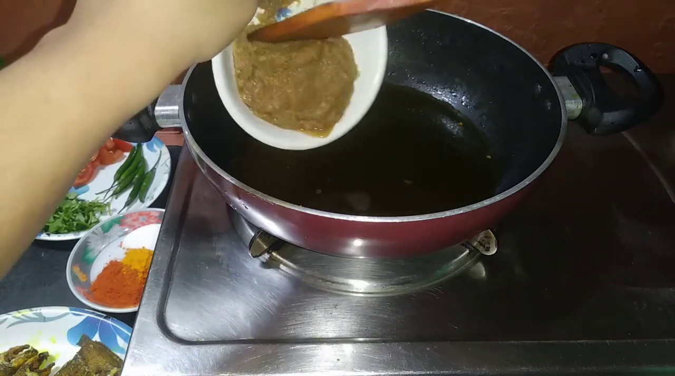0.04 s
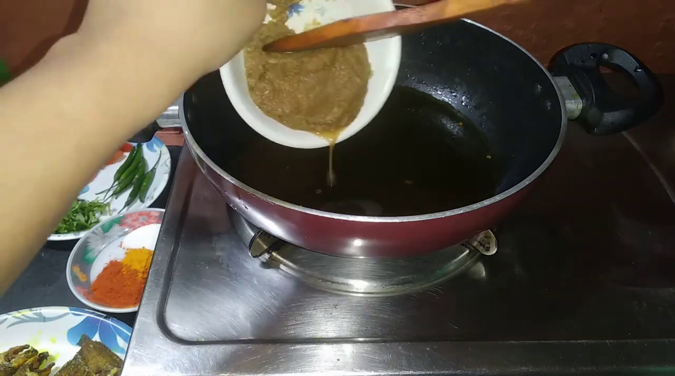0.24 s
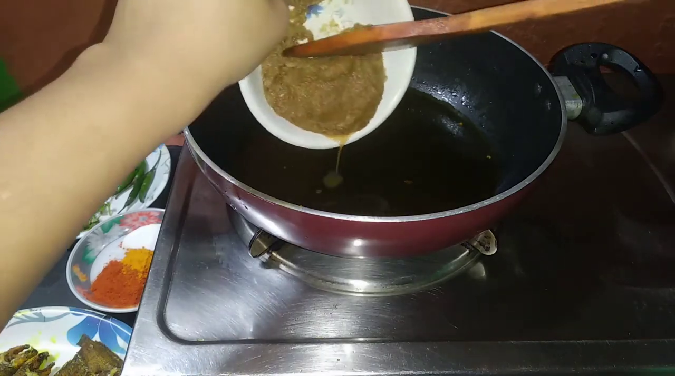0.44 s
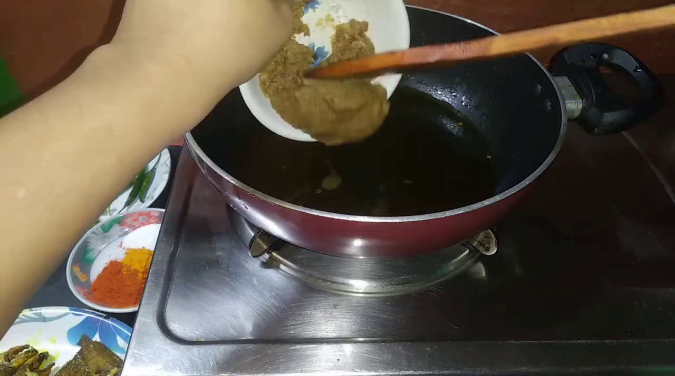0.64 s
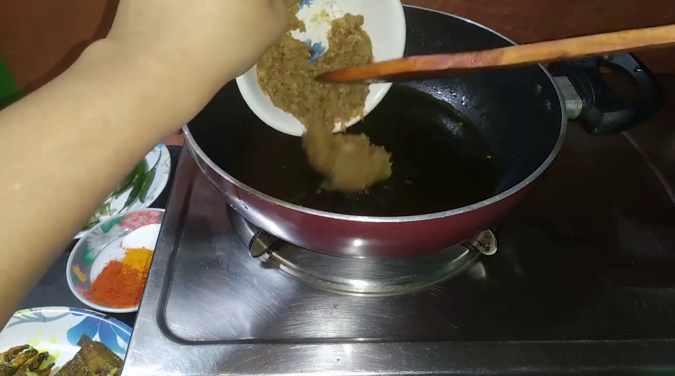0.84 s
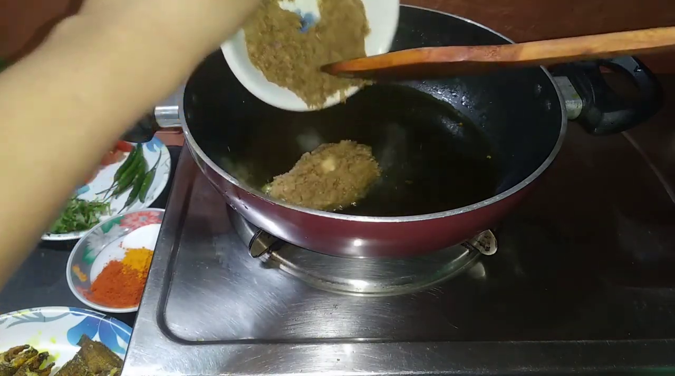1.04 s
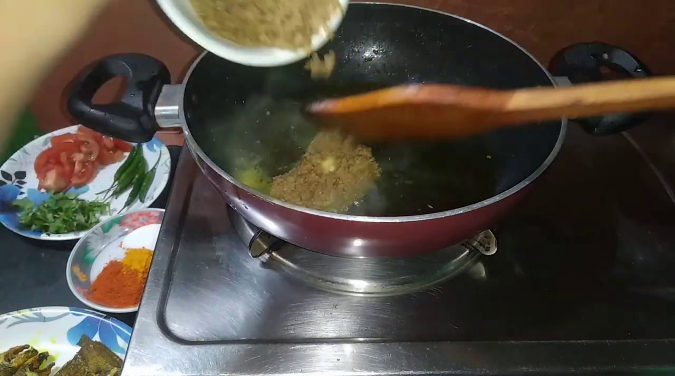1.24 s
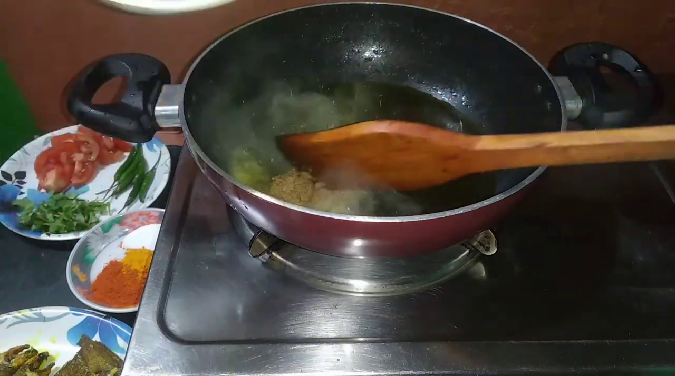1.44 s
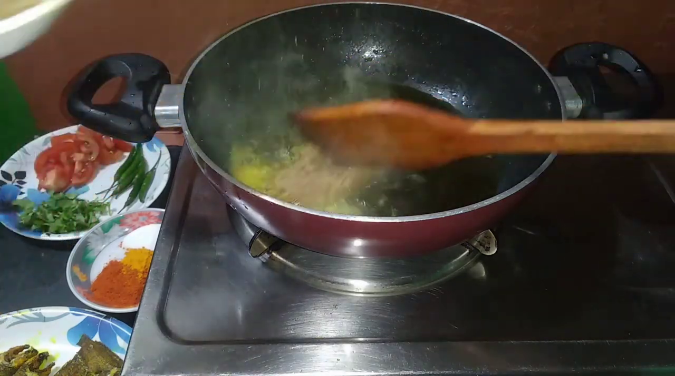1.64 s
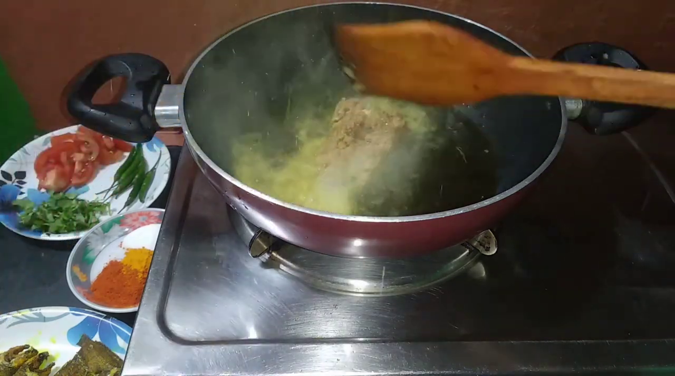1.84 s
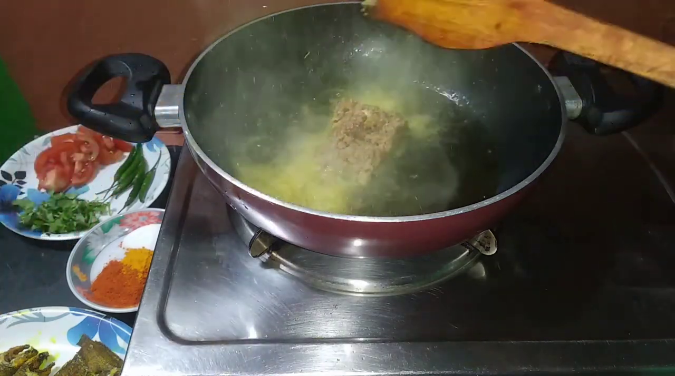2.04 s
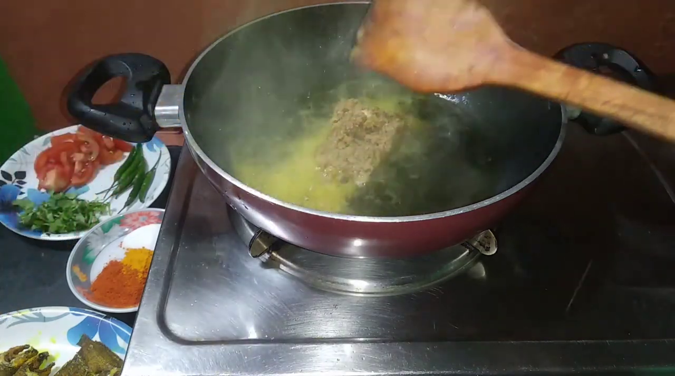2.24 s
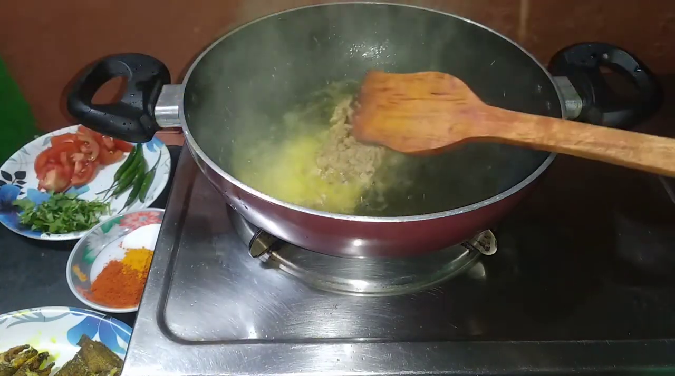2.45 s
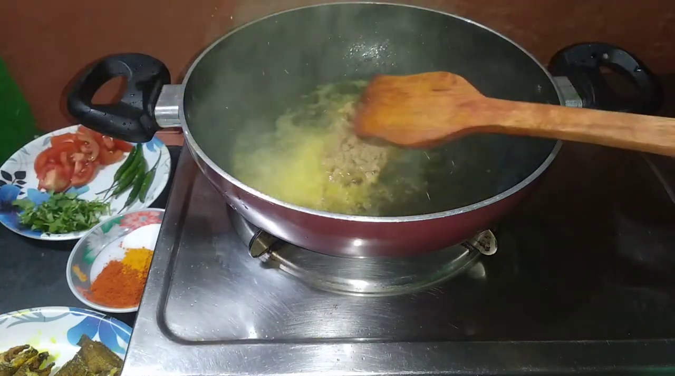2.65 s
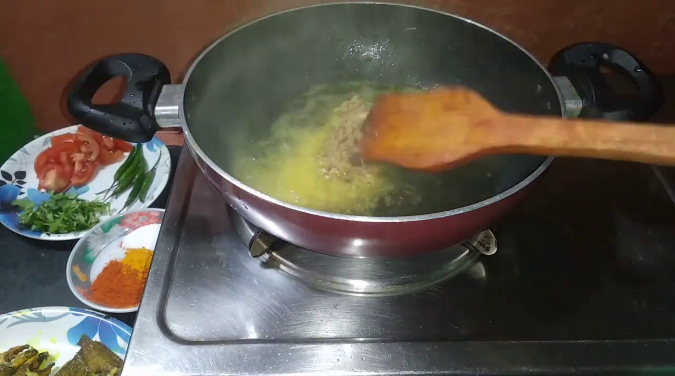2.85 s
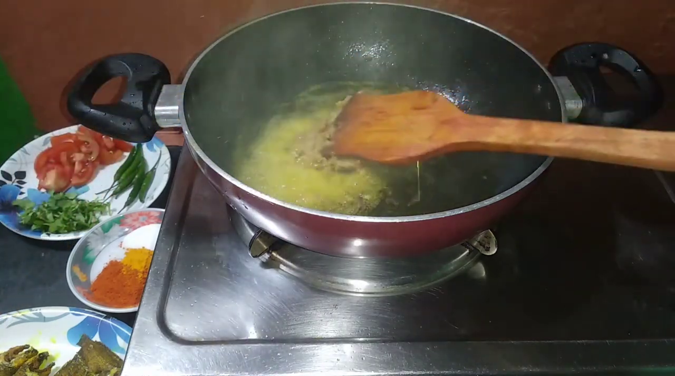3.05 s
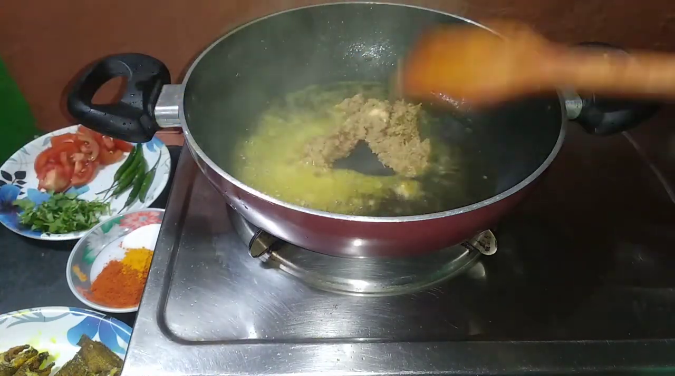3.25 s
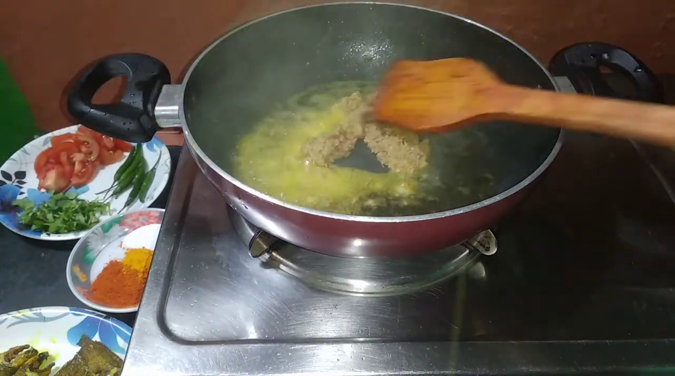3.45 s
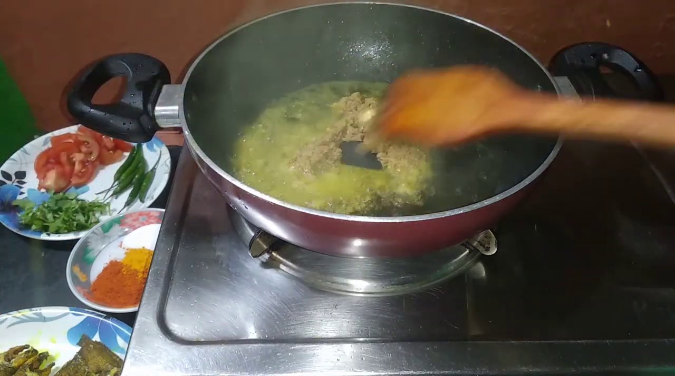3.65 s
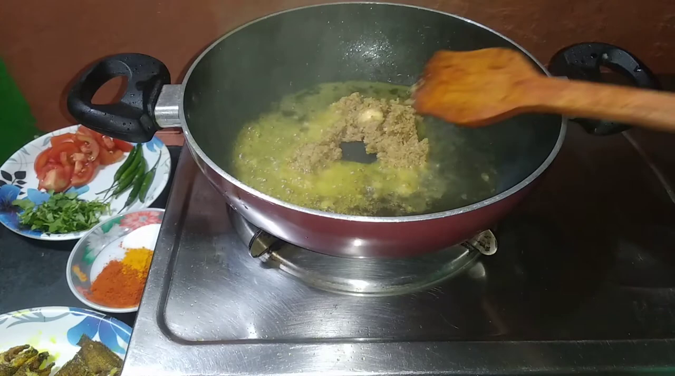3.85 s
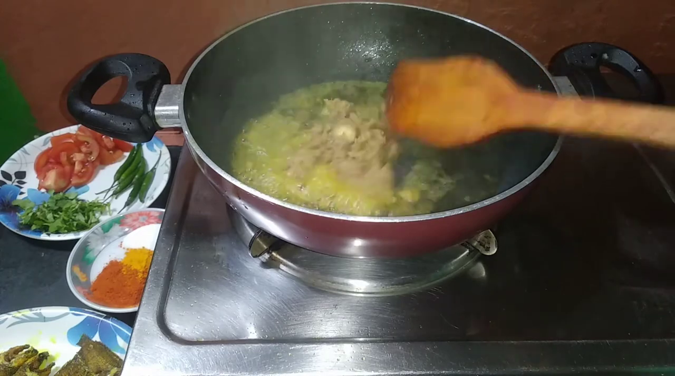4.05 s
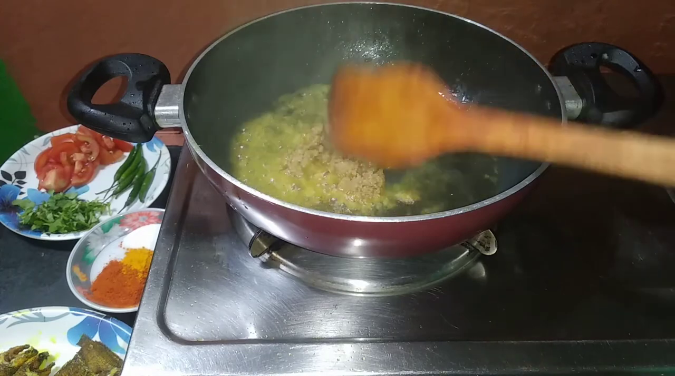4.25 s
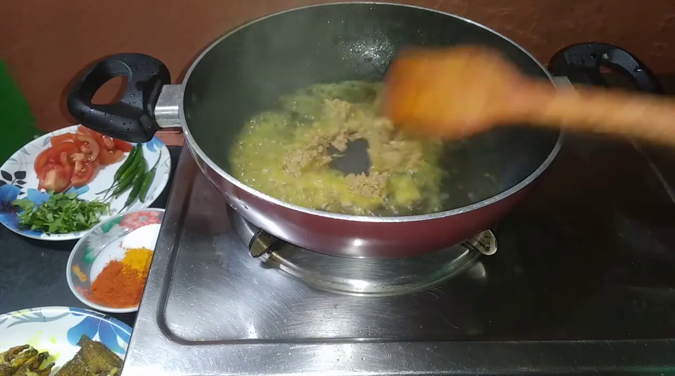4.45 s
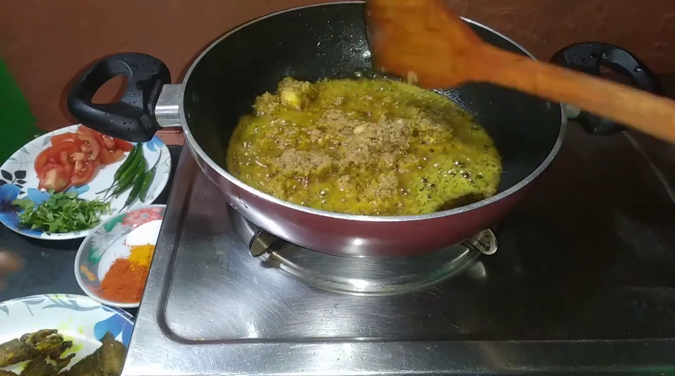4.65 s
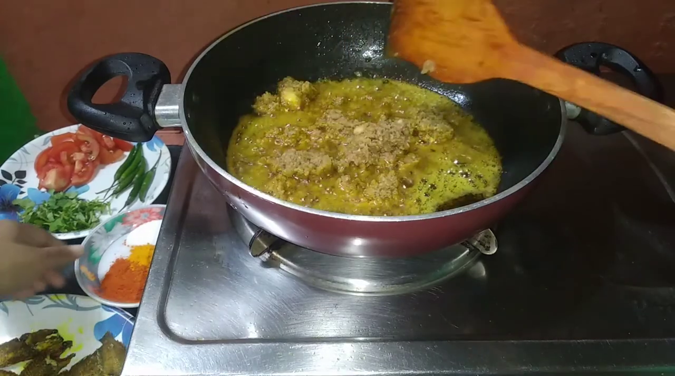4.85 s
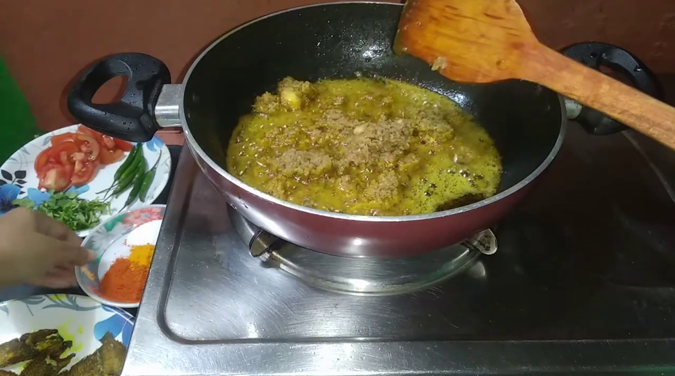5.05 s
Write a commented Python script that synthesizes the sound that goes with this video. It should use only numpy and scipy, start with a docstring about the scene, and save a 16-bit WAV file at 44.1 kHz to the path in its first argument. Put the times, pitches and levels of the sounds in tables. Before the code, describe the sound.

A near-silent kitchen with faint low tones, soft rustles and a light knock; half a second in, a drip squeals and fizzes in hot oil. Around one second wet paste lands and erupts into loud, bright sizzling with spits, pops and gurgles. Dull wooden spatula knocks follow. The boil eases slowly, then cuts abruptly to a quiet murmur. Close, small mono microphone, thin bass, short room tail.

```python
"""Wet onion paste meets hot oil

In a quiet kitchen a few drips fizz in a deep pan, the first one squealing; then the lump lands and boils fiercely.
Random tiny steam bursts make the hiss; larger bubbles spit, pop, gurgle and rumble, coloured by the pan's bowl.
A wooden spatula knocks now and then; pops and knocks reach the small microphone with a short tail off the walls.
Faint tones and rustles come first; near the end one hears, from one instant to the next, only a far quieter murmur.
"""
import sys
import numpy as np
from scipy import signal
from scipy.fft import rfft, irfft
from scipy.io import wavfile
from scipy.ndimage import uniform_filter1d

SR = 44100
rng = np.random.default_rng(int(sys.argv[2]) if len(sys.argv) > 2 else 0)


def transcribe(signal):
    """Save signal, clipped to [-1, 1], as a 16-bit WAV file at the path in sys.argv[1]."""
    frames = np.atleast_2d(signal).T
    limited = np.clip(frames, -1, 1)
    pcm = np.round(limited * 32767).astype(np.int16)
    wavfile.write(sys.argv[1], SR, pcm)


def gain_from_decibels(decibels):
    """Convert decibel values to linear amplitude factors."""
    exponent = np.asarray(decibels, float) / 20
    return 10 ** exponent


N = 225439

# Quiet kitchen background. Each row: frequency in Hz, relative level in dB per Hz.
KITCHEN_SPECTRUM = [(24, -32), (55, -40), (110, -1.5), (213, -6), (390, -12), (622, -15), (945, -15.5),
                    (1150, -13.5), (1450, -17), (2620, -22), (3880, -28), (6050, -25.5), (15500, -34)]
# Peaks of that background. Each row: centre in Hz, width in Hz, height in dB.
KITCHEN_PEAKS = [(284, 28, 2.5), (467, 60, 10), (1276, 41, 15.5), (2970, 150, 10), (3450, 400, 2),
                 (3950, 160, 12)]
# Faint low tones that come and go. Each row: start in seconds, length in seconds, pitch in Hz, level in dB.
LOW_TONES = [(-.03, 0.052, 484, -62), (0.32, 0.057, 490, -61.5), (0.39, 0.041, 287, -61),
             (0.442, 0.13, 292, -66), (.47, 0.077, 486, -69), (.6, 0.072, 280, -64),
             (0.657, 0.093, 480, -63), (0.748, 0.16, 284, -66), (0.795, 0.16, 487, -63)]
# Soft brushing before the first drip. Each row: start in seconds, length in seconds, level in dB,
# centre in Hz, width in octaves.
BRUSHES = [(0.086, 0.039, -69, 5500, 1.5), (0.118, 0.087, -63, 5500, 1.9), (.225, 0.044, -71, 1800, 1.4),
           (0.319, 0.062, -59, 1800, .5), (0.321, .06, -61.5, 4300, 1.2)]
# Dull knocks of spatula and bowl. Each row: start in seconds, level in dB, starting pitch in Hz,
# ring time (60 dB decay) in seconds.
SPATULA_KNOCKS = [(.0965, -60, 385, 0.022), (.0995, -48.5, 382, 0.02), (.1005, -56, 815, 0.017),
                  (.111, -58, 370, 0.017), (1.541, -34, 203, 0.0082), (1.613, -35, 231, 0.0089),
                  (1.6645, -29.5, 406, 0.0068), (2.1995, -40, 230, .016), (4.918, -45, 287, 0.086),
                  (4.948, -45.5, 500, 0.14), (4.985, -48, 870, 0.079), (4.957, -47, 182, 0.069),
                  (4.986, -46, 150, 0.058), (5.007, -51, 139, 0.11)]
# Vigour of the boil before wander and brief changes. Each row: time in seconds, fine fizz in dB,
# top of the fizz against it in dB, spitting in dB, bubbling in dB.
BOIL_VIGOUR = [(.37, -99, 15, -90, -73), (.44, -66, 9, -76, -67), (.5, -59.5, -7, -51, -60),
               (.6, -48.5, -13, -47.5, -67.5), (.915, -46.5, -16, -43.5, -56), (.93, -45.5, 6, -39, -59),
               (.945, -38, 0, -39.5, -44), (.98, -32.5, -7, -32, -39), (.995, -34.5, -3, -43, -36.5),
               (1.02, -37.5, -4, -36, -41), (1.048, -29, -7, -37, -37.5), (1.073, -25.5, -8, -36, -39),
               (1.1, -25, -8, -31, -37), (1.12, -23.5, -7, -28, -46), (1.15, -24.5, -7, -23, -36),
               (1.27, -24.5, -6.5, -27.5, -39), (1.38, -25, -9.5, -28, -36.5), (1.46, -26, -5, -31.5, -39),
               (1.53, -19.5, -10.5, -27.5, -38), (1.62, -22, -5, -31, -33), (1.7, -22, -5.5, -26, -35),
               (1.85, -19, -7.5, -26.5, -36), (2.02, -18, -5.5, -27, -33), (2.15, -19, -6.5, -27, -42.5),
               (2.3, -22, -7.5, -25.5, -34), (2.5, -22, -5, -27.5, -38.5), (2.7, -23, -8.5, -31, -38.5),
               (2.9, -23.5, -4, -30.5, -38.5), (3.05, -23.5, -5.5, -33.5, -35),
               (3.2, -25, -9.5, -31.5, -43.5), (3.38, -27, -6, -33, -36.5), (3.55, -26, -5.5, -32.5, -42),
               (3.64, -25.5, -3, -35.5, -42.5), (3.8, -25.5, -10, -33.5, -46.5),
               (3.93, -26, -5.5, -36.5, -39), (4.05, -25.5, -5.5, -30.5, -48),
               (4.13, -24.5, -8.5, -37.5, -44), (4.25, -28, -2, -37.5, -43), (4.38, -28, -4.5, -39.5, -45),
               (4.52, -30.5, -7, -42, -45.5), (4.66, -26, -4.5, -37.5, -47.5),
               (4.9379, -29.5, -4.5, -42.5, -43), (4.938, -51, -10, -59, -50.5),
               (5.11, -54.5, 2, -57.5, -54)]
# The largest bubbles, likewise. Each row: time in seconds, gurgle in dB, rumble in dB.
LARGEST_BUBBLES = [(.4, -85, -95), (.9, -78, -90), (1.0, -57.5, -67), (1.45, -50.5, -57),
                   (1.75, -49, -52.5), (2.3, -49.5, -58), (3.0, -49.5, -58.5), (3.5, -56.5, -63),
                   (4.0, -58, -61.5), (4.5, -59.5, -62), (4.9379, -56.5, -60), (4.938, -64, -61),
                   (5.11, -73, -61)]
# Brief surges and dips of the boil. Each row: time of the extreme in seconds, change in fizz in dB,
# change in spitting and bubbling in dB, up or down (gurgle and rumble take a share of the latter).
SURGES_AND_DIPS = [(.51, 9, 0), (.57, 6, 1), (.637, 6, -5), (.668, 5, -3), (0.705, 10, 9), (.768, 4.5, 2),
                   (0.845, 12.5, -5), (1.23, -3, 6), (1.611, 7, 0), (1.665, 4.5, 3), (1.52, 0, -3),
                   (1.57, 3, -3), (1.75, 5.5, -5), (1.91, 3.5, -1), (1.952, -1, 3.5), (2.05, 3, 1.5),
                   (2.18, 2.5, -5), (2.298, 6, 1), (2.43, -2, 1.5), (2.6, 1.5, 1), (2.832, 6.5, 0.5),
                   (2.887, 2, 7.5), (3.11, 1.5, -4), (3.244, 5.5, -5), (3.256, 7, 4.5), (3.283, 5, 1),
                   (3.31, 0, 1.5), (3.469, 7.5, 10), (3.562, 1.5, 6), (3.6, 5, 6), (3.662, 2, -3),
                   (3.781, 0, 8), (3.9, -2, -2), (3.98, -5, 6), (4.061, 0, 4), (4.187, 6, 5), (4.33, 2, 7),
                   (4.428, 7, 4), (4.61, 2, 7), (4.72, 3, 2), (4.82, 7, 4.5), (4.918, -4, 13)]
# Spectra of the bubble sizes, fine to large. Each row: frequency in Hz, relative level in dB per Hz.
FIZZ_SPECTRUM = [(2000, -19), (3400, -22.5), (3720, 0), (4980, -1), (6370, 2.5), (10500, -3.5),
                 (13600, -23), (22000, -120)]
FIZZ_TOP_SPECTRUM = [(5290, -52.5), (9000, -1), (12500, -3), (14800, -3), (15800, -4.5)]
SPITTING_SPECTRUM = [(1060, -50), (1800, -7), (1990, -1.5), (2240, 2), (3600, 8.5), (4680, -35),
                     (7920, -120)]
BUBBLING_SPECTRUM = [(470, -108), (800, -10.5), (994, -6), (1310, -1), (1800, -2), (2340, 3), (3960, -120)]
GURGLE_SPECTRUM = [(240, -63), (400, -13.5), (644, -4.5), (740, -8.5), (800, -71), (1040, -41),
                   (1760, -120)]
RUMBLE_SPECTRUM = [(15, -27), (30, -13), (92, -11.5), (195, 0), (365, -9.5), (400, -14.5), (520, 4),
                   (880, -120)]
# Resonances of the bowl as heard from the small spot where the first drips fizz, from the fresh lump,
# from the stirred paste with the air above the oil, and from paste spread over the bottom.
# Each row: centre in Hz, width in Hz, peak or notch in dB.
BOWL_FROM_DRIPS = [(1240, 100, 2), (1730, 190, -5.5), (2070, 58, 3), (2560, 760, -23.5), (3030, 49, -29),
                   (3470, 270, -20), (3850, 180, -17), (4560, 300, 3.5), (5170, 150, -1), (6270, 210, 9.5),
                   (7170, 330, 9), (8100, 160, -13), (9200, 270, 5)]
BOWL_FROM_LUMP = [(700, 37, -7), (975, 44, -38), (1310, 400, 1), (1863, 180, -53), (2090, 45, 4),
                  (2500, 270, 1), (2900, 260, -28), (3530, 310, -10), (3730, 105, -16), (4200, 240, 2),
                  (5660, 85, 8), (6900, 67, 5), (7650, 80, 5), (8920, 55, -23)]
BOWL_FROM_STIRRED = [(640, 80, 6), (770, 70, -12), (915, 60, 6), (985, 60, -8), (1340, 60, 7),
                     (1600, 70, 4), (1790, 90, -8), (2050, 60, 8), (2290, 90, -6), (2884, 40, 5),
                     (2975, 90, -6), (3330, 110, -9), (3480, 120, -7), (3780, 110, 2.5), (4000, 120, -8),
                     (5150, 120, -3), (5863, 40, 4), (6336, 40, 4), (6515, 50, 4), (6872, 60, 4),
                     (7072, 50, 4), (7186, 40, 4), (7378, 70, 4), (7542, 50, 4), (9142, 60, 4),
                     (9887, 40, 4), (11197, 50, 4), (12339, 40, 5)]
BOWL_FROM_SPREAD = [(645, 61, 8), (738, 35, -12.5), (970, 27, -20), (1340, 20, 15), (1440, 69, -2.5),
                    (1830, 100, -1.5), (2050, 120, 5), (2206, 116, -22), (2600, 150, 3.5),
                    (2860, 90, -10.5), (3427, 330, -10.5), (3720, 49, 6.5), (3860, 170, -3),
                    (4930, 120, -3), (6180, 65, 4.5), (6600, 50, 0.5), (6950, 77, 6), (7340, 76, 6),
                    (9500, 74, 2.5)]
# Broad colour of the quiet murmur heard last. Each row: centre in Hz, width in Hz, peak or notch in dB.
MURMUR_COLOUR = [(500, 200, 1), (850, 300, 11), (1500, 500, 1), (2100, 360, -6), (2970, 800, 1),
                 (4160, 460, 4.5), (6500, 1200, -5), (9800, 1500, -2), (12000, 5000, 3)]
# How far narrow bands swell and drop out. Each row: frequency in Hz, swell in dB and drop-out in dB,
# both per unit of a random field.
BAND_CHANGES = [(300, 2.5, 0.5), (1020, 3, 6), (2000, 5.5, 54), (3540, 6.5, 33), (5170, 5.5, 36),
                (6860, 3.5, 8), (9500, 4, 4), (12100, 11.5, 27)]
# The first drip squeals as it skates on the oil. Each row: time in seconds, pitch in Hz, level in dB.
DRIP_SQUEAL = [(.475, 4840, -68), (.488, 4300, -55), (.503, 3650, -51), (.52, 3770, -49), (.535, 3350, -55),
               (.565, 3240, -66)]
# Fixed resonances that the squeal passes. Each row: centre in Hz, width in Hz, peak or notch in dB.
SQUEAL_RESONANCES = [(2950, 120, 7), (3200, 120, -8), (3450, 150, 6), (3760, 120, -12), (4050, 140, 7),
                     (4450, 200, -6), (4800, 140, 8)]
# Steam pocket under the lump. Each row: frequency in Hz, relative level in dB per Hz.
POCKET_SPECTRUM = [(550, -28), (720, 5), (870, 10), (960, -24), (1150, -10), (1500, -30)]
# Big bubbles bursting. Each row: start in seconds, level in dB, starting pitch in Hz.
BIG_BUBBLE_POPS = [(1.17, -21, 2340), (1.199, -20, 2550), (1.291, -13, 2170), (1.345, -22, 2330),
                   (1.397, -14.5, 2210), (1.433, -17.5, 2140), (1.503, -16, 1890), (2.212, -22, 2600),
                   (2.3204, -17, 2720), (2.4268, -19, 2670), (2.519, -16, 2560), (2.5987, -25.5, 1320),
                   (2.7573, -18, 2900), (2.885, -18, 2060), (3.108, -20, 2170), (3.177, -24, 2600),
                   (3.258, -21, 2460), (3.28, -19, 2100), (3.302, -18, 2640), (3.4652, -21, 1720),
                   (3.474, -17, 2100), (3.4805, -17.5, 1940), (3.485, -34, 2300), (3.494, -22, 1830),
                   (3.5328, -20.5, 2560), (3.659, -22, 2830), (3.6789, -20.5, 2020), (3.773, -18, 2720),
                   (3.776, -24, 2090), (3.848, -21.5, 2720), (3.863, -32, 1980), (3.878, -23, 2670),
                   (3.8926, -19.5, 2770), (3.974, -27.5, 1660), (4.0138, -28, 2630), (4.0494, -22, 1940),
                   (4.064, -23, 1990), (4.319, -26, 1770), (4.3222, -19.5, 1730), (4.328, -35, 1340),
                   (4.3467, -25, 2660), (4.422, -33, 2100), (4.4638, -28, 1980), (4.6086, -19, 2080),
                   (4.727, -30, 2400), (4.8532, -22, 2520), (4.9222, -22.5, 2400)]

LANDING_S, LANDING_OVER_S = 0.98, 0.11
STIRRED_S, STIRRED_OVER_S = 1.203, 0.31
SPREAD_S, SPREAD_OVER_S = 3.1, 0.51
MURMUR_FROM_S = 4.938  # abrupt change of level and colour


def curve(table):
    """Columns of a table of (seconds, value, ..) rows, one value a sample; held at the ends."""
    s, *columns = np.transpose(table)
    return [np.interp(np.arange(N) / SR, s, column) for column in columns]


def unit(x):
    """Scale to rms 1."""
    return x / np.sqrt(np.mean(x ** 2))


def swell(start_s, length_s):
    """Smooth hump, a squared half sine, from start_s on."""
    return np.sin(np.pi * np.clip((np.arange(N) / SR - start_s) / length_s, 0, 1)) ** 2


def walk(rate):
    """Random levels, each held 1 / rate seconds and slewed twice; spread 1."""
    hold = int(SR / rate)
    levels = np.repeat(rng.standard_normal(N // hold + 1), hold)
    return unit(uniform_filter1d(uniform_filter1d(levels, hold), hold)[:N])


def colour(x, spectrum=((20, 0), (20000, 0)), bumps=()):
    """Causal minimum-phase filter with the given spectrum and bell-shaped peaks or notches."""
    size = 2 ** 13
    hz = np.arange(size // 2 + 1) * SR / size + 1
    at, db = np.transpose(spectrum)
    gain_db = np.interp(np.log(hz), np.log(at), db, left=-60, right=-60)
    for centre, width, bump_db in bumps:
        gain_db = gain_db + bump_db / (1 + (2 * (hz - centre) / width) ** 2)
    # folding the cepstrum onto positive time makes the filter causal
    cepstrum = irfft(np.log(gain_from_decibels(gain_db)))
    cepstrum = cepstrum * np.r_[1, 2 * np.ones(size // 2 - 1), 1, np.zeros(size // 2 - 1)]
    return signal.fftconvolve(x, irfft(np.exp(rfft(cepstrum))))[:N]


def patches(x, band_hz, hold_s, weak_db):
    """Narrow bands swell, fade and briefly drop out, most often where they are weak already."""
    size = 1024
    hz, _, spec = signal.stft(x, SR, nperseg=size, noverlap=size * 3 // 4)
    bins = max(round(band_hz * size / SR), 1)
    frames = max(round(hold_s * 4 * SR / size), 1)
    field = rng.standard_normal(spec.shape)
    for _ in range(2):
        field = uniform_filter1d(uniform_filter1d(field, bins, axis=0), frames, axis=1)
    field = unit(field)
    # level of each band against its neighbours
    power = uniform_filter1d(np.abs(spec) ** 2, 4 * frames, axis=1) + 1e-20
    near, wide = (np.abs(uniform_filter1d(power, k, axis=0)) for k in (bins, 5 * bins))
    standing = 10 * np.log10(near / wide) / weak_db
    at, swell_db, hole_db = np.transpose(BAND_CHANGES)
    swell_db, hole_db = (np.interp(hz, at, column)[:, None] for column in (swell_db, hole_db))
    hole = np.clip(-field - standing - 1, 0, 2)
    gain = gain_from_decibels(swell_db * np.minimum(field, 0.9) - hole_db * hole)
    # restore half, in dB, of each band's change in power
    restore = np.sqrt(np.sum(power, axis=1) / np.sum(power * gain ** 2, axis=1))
    gain = gain * restore[:, None] ** 0.5
    return signal.istft(spec * gain, nperseg=size, noverlap=size * 3 // 4)[1][:N]


def bursts(per_s, scatter_db, spurt_db, spurt_rate):
    """Steam bursts at random instants, with scattered sizes and a slow wander in level."""
    chance, sign, size = rng.random(N), rng.standard_normal(N), rng.exponential(size=N)
    level_db = scatter_db * np.minimum(size, 5) + spurt_db * walk(spurt_rate)
    return (chance < per_s / SR) * sign * gain_from_decibels(level_db)


def rings(events, spray, glide, attack_s):
    """Each event rings at its gliding pitch, with a spray of noise inside the same decay."""
    out, t = np.zeros(N + SR), np.arange(SR // 8) / SR
    noise = rng.standard_normal((len(events), len(t)))
    for (s, db, hz, t60), hiss in zip(events, noise):
        shape = (1 - np.exp(-t / attack_s)) * np.exp(-np.log(1000) * t / t60)
        band = signal.butter(2, [0.81 * hz, 1.83 * hz], "bandpass", fs=SR, output="sos")
        tone = np.sin(2 * np.pi * hz * t * (1 + glide * t / t60))
        tone = tone + spray * unit(signal.sosfilt(band, hiss))
        start = int(s * SR)
        out[start:start + len(t)] += gain_from_decibels(db) * shape * tone / shape.max()
    return out[:N]


def kitchen_tail(x):
    """Adds the short diffuse tail of the walls and stove top: decaying noise after 3 ms."""
    t60_s, tail_db = 0.095, -6.5
    t = np.arange(SR // 2) / SR
    tail = rng.standard_normal(len(t)) * np.exp(-np.log(1000) * t / t60_s) * (t > 0.003)
    return x + gain_from_decibels(tail_db) * signal.fftconvolve(x, tail / np.sqrt(np.sum(tail ** 2)))[:N]


def hush():
    """Kitchen background: coloured noise that wanders in level, then has band drop-outs laid on it."""
    air = unit(colour(rng.standard_normal(N), KITCHEN_SPECTRUM, KITCHEN_PEAKS))
    return patches(gain_from_decibels(-66 + 1.7 * walk(10)) * air, band_hz=120, hold_s=0.065, weak_db=4)


def tones():
    """Faint low tones, wavering together in pitch and blurred by random amplitude and phase."""
    blur_per_s, blur_depth = 45, 0.7
    out, cycles = 0, 2 * np.pi * np.cumsum(1 + 0.012 * walk(9.9)) / SR
    for s, length_s, hz, db in LOW_TONES:
        blur = 1 + blur_depth * (walk(blur_per_s) + 1j * walk(blur_per_s))
        out = out + gain_from_decibels(db) * swell(s, length_s) ** 0.5 * (blur * np.exp(1j * hz * cycles)).real
    return out


def rustles():
    """Soft brushing: short puffs of band-limited noise."""
    out = 0
    for s, length_s, db, hz, octaves in BRUSHES:
        edges = hz * 2 ** (octaves * np.array([-0.5, 0.5]))
        band = signal.butter(2, edges, "bandpass", fs=SR, output="sos")
        puff = unit(signal.sosfilt(band, rng.standard_normal(N)))
        out = out + gain_from_decibels(db + 1.9 * walk(95.5)) * swell(s, length_s) * puff
    return out


def knocks():
    """Spatula and bowl knock: damped, slightly falling rings with noise, and the kitchen's tail."""
    return kitchen_tail(rings(SPATULA_KNOCKS, spray=0.57, glide=-0.065, attack_s=0.0021))


def surges_and_dips():
    """Brief changes in dB, up or down, of fizz and of larger bubbles: quick onset, longer return for bubbles."""
    onset_s, fizz_return_s, bubble_return_s = 0.0038, 0.0035, 0.012
    out, t = 0, np.arange(N) / SR
    return_s = np.array([[fizz_return_s], [bubble_return_s]])
    for s, *change_db in SURGES_AND_DIPS:
        out = out + np.c_[change_db] * np.exp(-np.maximum((s - t) / onset_s, (t - s) / return_s))
    return out


def bubble_wander():
    """Chance wander in dB of one bubble size, quick and slow together."""
    return 0.93 * walk(30) + 0.6 * walk(12)


def crackle(count=18):
    """Small bubbles of many sizes burst at random, each ringing briefly at its own pitch."""
    low_hz, octaves, t60_s = 1900, 1.5, 0.01
    out, r = 0, np.exp(-np.log(1000) / (t60_s * SR))
    for hz in low_hz * 2 ** (octaves * np.arange(count) / count):
        resonator = [1, -2 * r * np.cos(2 * np.pi * hz / SR), r ** 2]
        hits = bursts(per_s=70, scatter_db=2, spurt_db=2, spurt_rate=20)
        out = out + unit(signal.lfilter([1, 0, -1], resonator, hits))
    return unit(out)


def drifting(x, bumps):
    """Bowl colour that fades between a lower and a higher place of its peaks and notches below 5100 Hz."""
    drift, below_hz = 0.0074, 5100  # drift as a fraction of the pitch
    share = np.clip(0.5 + 3.1 * walk(2.4), 0, 1)
    out = 0
    for part, shift in ((share, drift), (1 - share, -drift)):
        moved = [(hz * (1 + shift * (hz < below_hz)), width, db) for hz, width, db in bumps]
        out = out + colour(x * part, bumps=moved)
    return out


def sizzle():
    """Bubbles of all sizes, fine fizz to low rumble, heard through the pan's bowl; last, a quiet murmur."""
    t = np.arange(N) / SR
    fizz_db, top_db, spit_db, bubbling_db = curve(BOIL_VIGOUR)
    gurgle_db, rumble_db = curve(LARGEST_BUBBLES)
    fizz_change_db, bubble_change_db = surges_and_dips()
    fizz_db = fizz_db + fizz_change_db + 0.91 * walk(75)
    spit_now_db = spit_db + bubble_change_db + bubble_wander()
    bubbling_db = bubbling_db + bubble_change_db + bubble_wander()
    gurgle_db = gurgle_db + 0.6 * bubble_change_db + bubble_wander()
    rumble_db = rumble_db + 0.1 * bubble_change_db + bubble_wander()

    fine = bursts(per_s=25000, scatter_db=1.3, spurt_db=0.5, spurt_rate=26)
    spits = bursts(per_s=8000, scatter_db=-3.0, spurt_db=1.0, spurt_rate=60)
    bubbles = bursts(per_s=6000, scatter_db=-2.0, spurt_db=0.0, spurt_rate=12)
    gurgles = bursts(per_s=4000, scatter_db=1, spurt_db=0.5, spurt_rate=30)
    rumbles = bursts(per_s=4000, scatter_db=1, spurt_db=0.4, spurt_rate=20)
    layers = ((fine, FIZZ_SPECTRUM, fizz_db), (fine, FIZZ_TOP_SPECTRUM, fizz_db + top_db),
              (spits, SPITTING_SPECTRUM, spit_now_db), (bubbles, BUBBLING_SPECTRUM, bubbling_db),
              (gurgles, GURGLE_SPECTRUM, gurgle_db), (rumbles, RUMBLE_SPECTRUM, rumble_db))
    boil = sum(gain_from_decibels(db) * unit(colour(x, spectrum)) for x, spectrum, db in layers)
    landed = np.clip((t - LANDING_S) / LANDING_OVER_S, 0, 1)
    boil = boil + landed * gain_from_decibels(spit_db - 7) * crackle()  # 7 dB under the steady spitting

    # the boiling moves from the drips to the lump, then over the whole bottom, and the colour follows
    stirred = np.clip((t - STIRRED_S) / STIRRED_OVER_S, 0, 1)
    spread = np.clip((t - SPREAD_S) / SPREAD_OVER_S, 0, 1)
    stages = ((1 - landed, BOWL_FROM_DRIPS), (landed - stirred, BOWL_FROM_LUMP),
              (stirred - spread, BOWL_FROM_STIRRED), (spread, BOWL_FROM_SPREAD))
    bowl = sum(drifting(boil * np.sqrt(np.maximum(share, 0.0)), bumps) for share, bumps in stages)
    murmur = colour(boil * (t >= MURMUR_FROM_S), bumps=MURMUR_COLOUR)
    return sum(patches(x, band_hz=90, hold_s=0.04, weak_db=2) * gate
               for x, gate in ((bowl, t < MURMUR_FROM_S), (murmur, t >= MURMUR_FROM_S)))


def squeal():
    """Mostly falling squeal of the first drip, roughened by random phase, through fixed resonances."""
    hz, squeal_db = curve(DRIP_SQUEAL)
    rough = walk(1500) + 1j * walk(1500)
    t = np.arange(N) / SR
    tone = (rough * np.exp(2j * np.pi * np.cumsum(hz) / SR)).real
    sound = gain_from_decibels(squeal_db + 2.0 * walk(123)) * tone
    sounding = (t > DRIP_SQUEAL[0][0]) * (t < DRIP_SQUEAL[-1][0])
    return colour(sound * sounding, bumps=SQUEAL_RESONANCES)


def pocket():
    """Hollow bubbling of steam under the lump: swells soon after landing, collapses when stirred."""
    from_s, peak_s, start_db, peak_db, fall_db_per_s = 1.08, 1.3, -54, -47, 199
    t = np.arange(N) / SR
    steam = bursts(per_s=400, scatter_db=2.5, spurt_db=1.5, spurt_rate=17.0)
    hollow = unit(colour(steam, POCKET_SPECTRUM))
    db = np.interp(t, (from_s, peak_s), (start_db, peak_db))
    db = db - fall_db_per_s * np.maximum(t - peak_s, 0)
    return gain_from_decibels(db) * np.clip((t - from_s) / 0.022, 0, 1) * hollow


def pops():
    """Big bubbles burst: a rising snap and a fainter, longer ring, coloured by bowl and kitchen."""
    snaps = rings([(*pop, 0.01) for pop in BIG_BUBBLE_POPS], spray=0.35, glide=0.11, attack_s=0.00065)
    after = rings([(*pop, 0.064) for pop in BIG_BUBBLE_POPS], spray=0.72, glide=0.062, attack_s=0.0043)
    heard = kitchen_tail(colour(snaps + gain_from_decibels(-18.5) * after, bumps=BOWL_FROM_STIRRED))
    return heard * (np.arange(N) < MURMUR_FROM_S * SR)


def scene():
    """The pan, the knocks and the kitchen, in one channel."""
    around_pan = hush() + tones() + rustles() + knocks()
    pan = sizzle() + squeal() + pocket() + pops()
    return (around_pan + pan)[None]


def roll_off(x):
    """The treble ends steeply here."""
    return signal.sosfilt(signal.butter(12, 16590, fs=SR, output="sos"), x)


def record(dry):
    """A small microphone rounds the loudest peaks and cuts bass and top."""
    low_cut_hz, top_hz = 117, 15750
    rounded = np.tanh(1.3 * dry) / 1.3
    thin = signal.sosfilt(signal.butter(2, low_cut_hz, "highpass", fs=SR, output="sos"), rounded)
    cut = signal.sosfilt(signal.ellip(10, 0.2, 80, top_hz, fs=SR, output="sos"), thin)
    return roll_off(cut)


dry = scene()
out = record(dry)
transcribe(out)
```